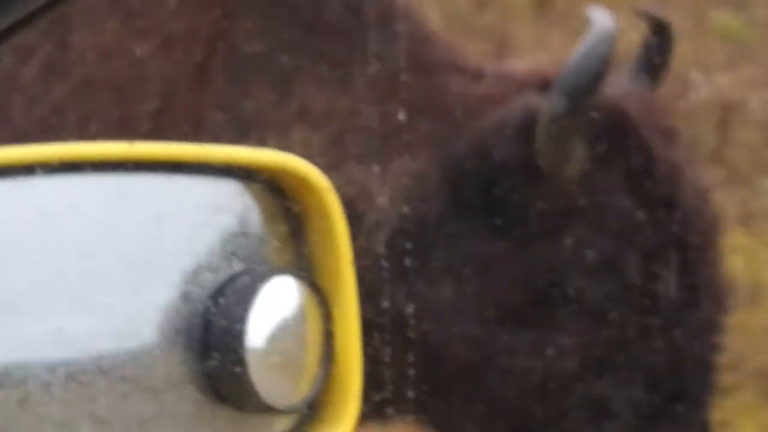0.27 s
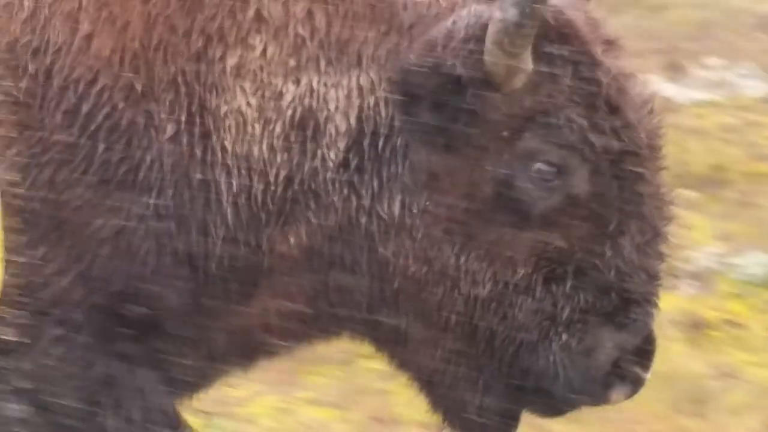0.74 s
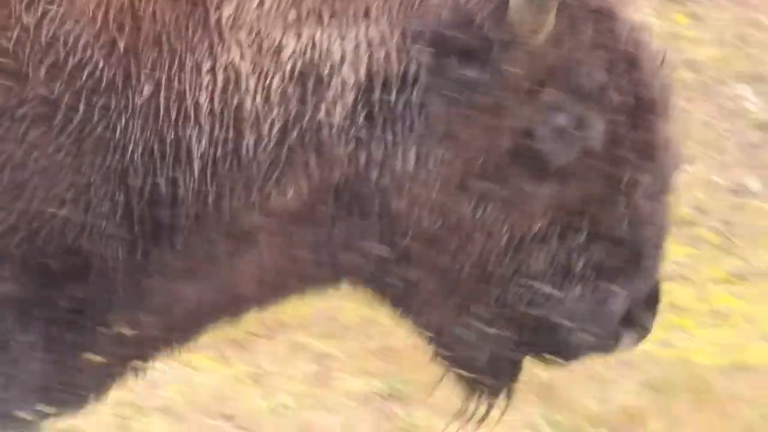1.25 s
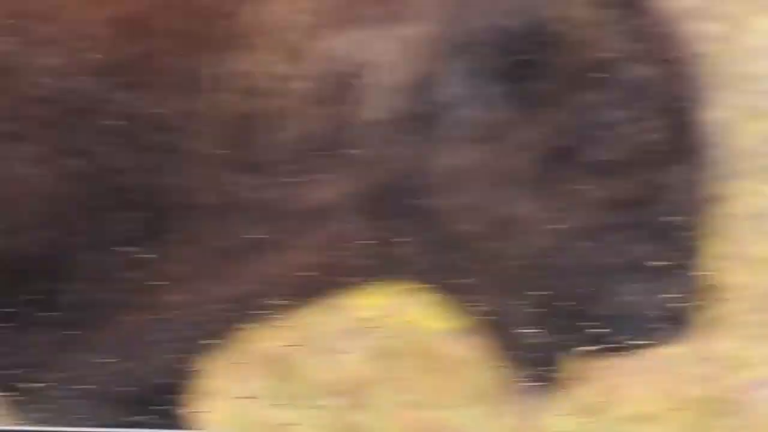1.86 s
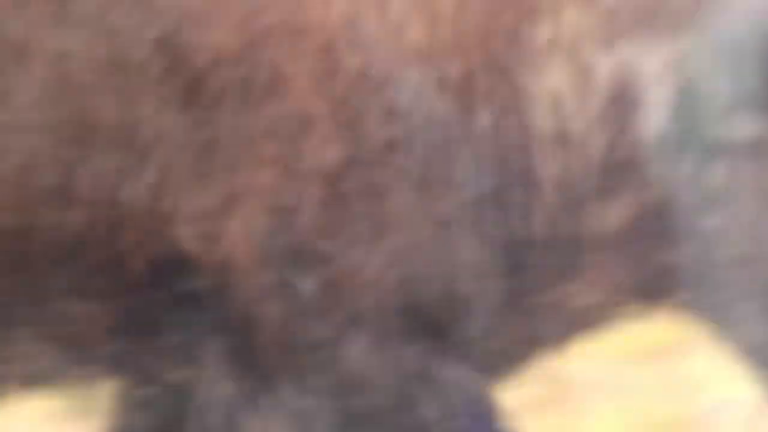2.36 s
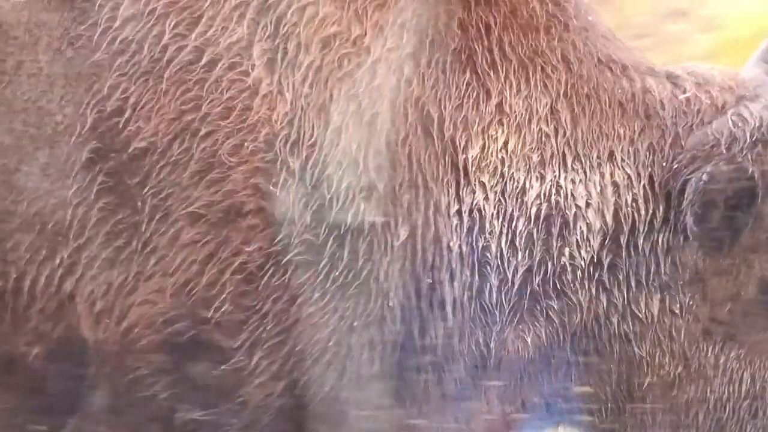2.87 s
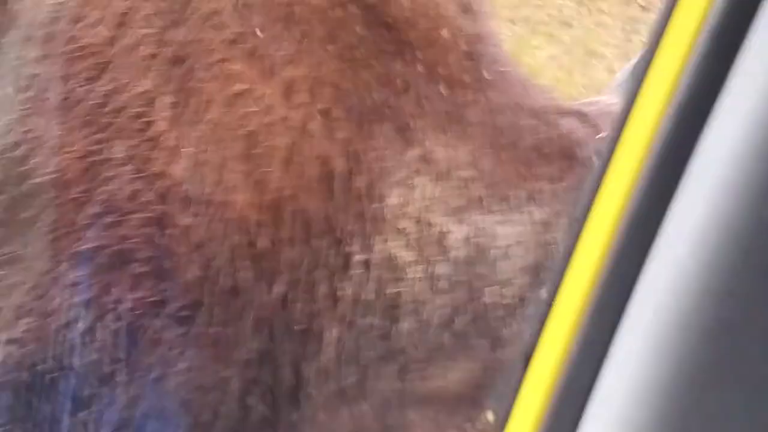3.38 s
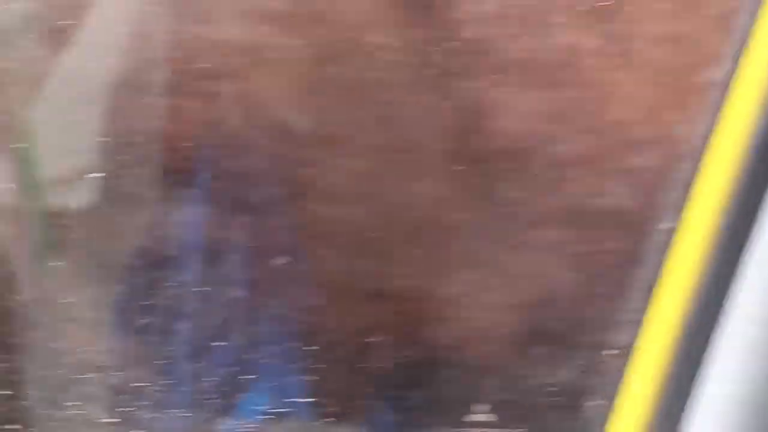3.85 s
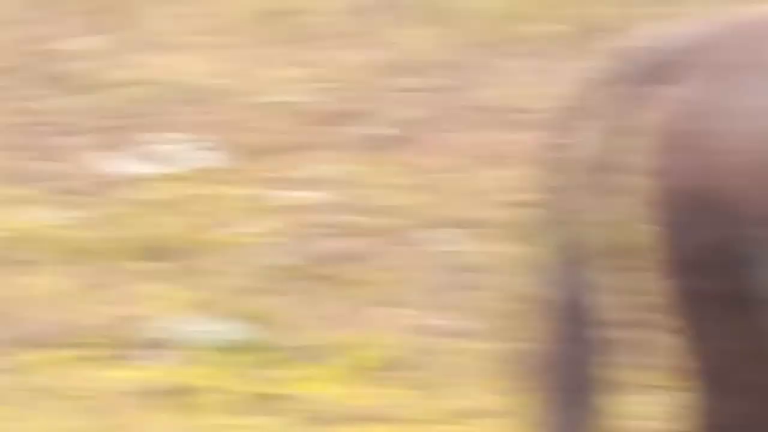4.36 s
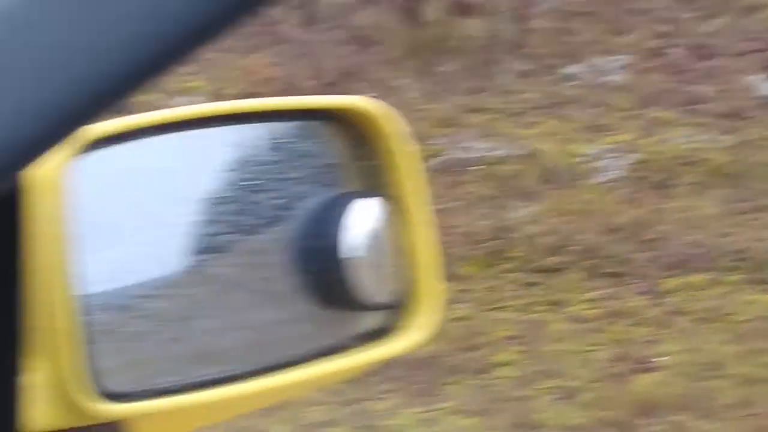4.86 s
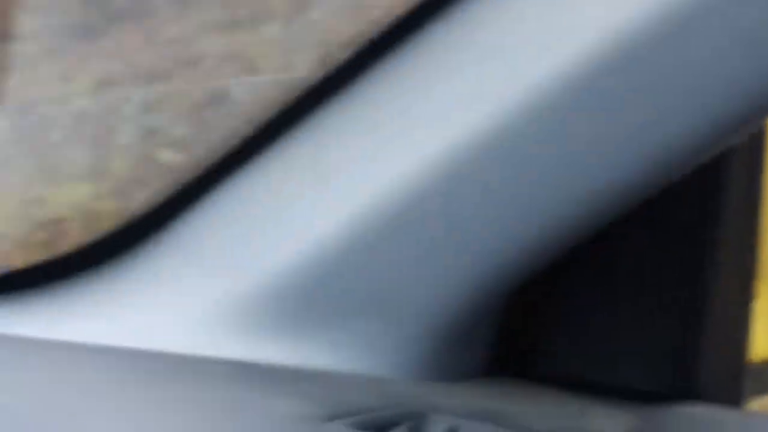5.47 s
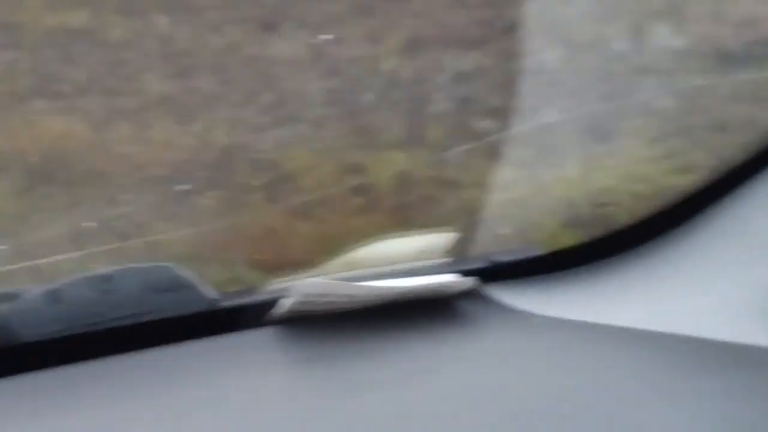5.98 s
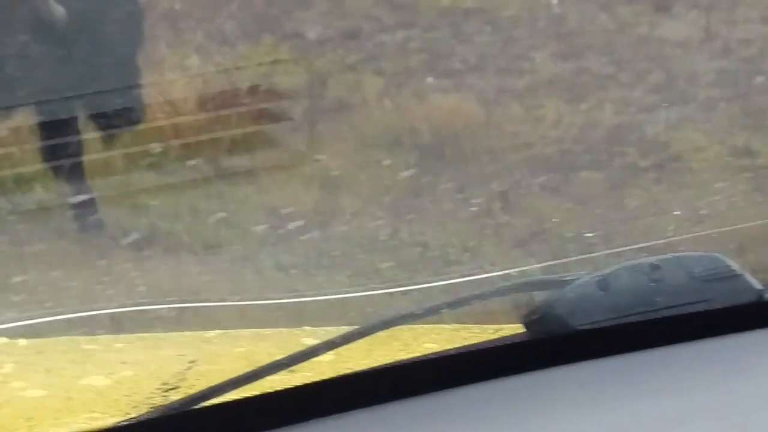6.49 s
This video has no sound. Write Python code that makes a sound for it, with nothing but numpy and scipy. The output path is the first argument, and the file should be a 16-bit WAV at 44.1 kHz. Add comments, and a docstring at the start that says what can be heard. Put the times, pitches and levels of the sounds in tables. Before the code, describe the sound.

Inside a quiet parked car, a hand-held stereo microphone picks up hiss, low rumble and cloth rustle. Dull bumps touch the hollow door as a bison passes. Just before three seconds its coat scrubs the door, the side mirror groans and snaps with a sharp clack, then a far louder double crack and boom. A faint spring ring fades, followed by small ticks, a solid thump and soft handling knocks.

```python
"""Bison against a parked car

Heard from inside: an animal leans on the door. Its coat scrubs (noise in slow swells), the side mirror snaps
over with hard clacks (noise bursts and ringing tones), the door booms and a spring rings on (fading tones).
Around this: soft knocks (pulses falling in pitch), ticks, and the rustle and low rumble of a hand-held
camera (shaped noise), with a steady hiss and a thin electronic whine (two unsteady tones)."""
import sys
import numpy as np
from scipy import signal
from scipy.fft import rfft, irfft, next_fast_len
from scipy.io import wavfile
from scipy.ndimage import map_coordinates

SR = 44100
rng = np.random.default_rng(int(sys.argv[2]) if len(sys.argv) > 2 else 0)


def inscribe(sig):
    """Save sig as 16-bit PCM at rate SR to the path in sys.argv[1].

    A 1-D sig is mono; a 2-D sig holds one channel per row.
    Samples are clipped to [-1, 1] before scaling.
    """
    pcm = np.round(np.clip(np.atleast_2d(sig).T, -1, 1) * 32767)
    wavfile.write(sys.argv[1], SR, pcm.astype(np.int16))


N = 296352  # length in samples


def amp(db):
    """Turn decibels into gain."""
    return 10 ** (np.asarray(db) / 20)


def unit(x):
    """Scale a signal to an rms of 1."""
    return x / np.sqrt(np.mean(x ** 2) + 1e-20)


def along(points, hz):
    """Read a curve of (frequency, value) points on a logarithmic frequency axis."""
    f, v = np.transpose(points)
    return np.interp(np.log(hz + 1), np.log(f + 1), v)


def wobble(rate):
    """Draw a smooth random curve with `rate` random points a second."""
    return map_coordinates(rng.standard_normal(int(N * rate / SR) + 4), [np.arange(N) * rate / SR])


def filtered(x, response):
    """Colour a sound: multiply its spectrum by a response of frequency."""
    m = next_fast_len(N + 8192)
    spectrum = rfft(x, m) * response(np.fft.rfftfreq(m, 1 / SR))
    return irfft(spectrum, m)[..., :N]


# How alike left and right are. Columns: f/Hz, likeness (1 = the same, 0 = unrelated)
LIKENESS = [(100, 0.37), (300, 0.25), (550, 0.14), (1000, -0.092), (1500, -0.035), (3000, 0.015)]


def paired(noise):
    """Blend two unrelated signals into left and right: more alike in the bass than in the treble."""
    turn = lambda hz: np.arccos(np.clip(along(LIKENESS, hz), -1, 1)) / 2
    mid, side = filtered(noise, lambda hz: np.array([np.cos(turn(hz)), np.sin(turn(hz))]))
    return np.array([mid + side, mid - side])


def rush(spectrum):
    """Make coloured stereo noise with an rms of 1."""
    noise = rng.standard_normal((2, N))
    coloured = filtered(noise, lambda hz: amp(along(spectrum, hz)))
    return unit(paired(coloured))


def add(track, s, sound):
    """Mix a sound into a track, starting at s seconds."""
    part = track[round(s * SR):][:len(sound)]
    part += sound[:len(part)]


def ring(modes, rise, pitch=1, length=1):
    """Fading tones set off by one contact; each builds up over `rise` cycles, so deep ones come last."""
    t = np.arange(int(length * SR)) / SR
    total = np.zeros(len(t))
    for hz, db, t60 in modes:
        envelope = amp(db - 60 * t / t60) * (1 - np.exp(-t * hz / rise))
        total += envelope * np.sin(2 * np.pi * hz * pitch * t)
    return total


def bursts(times, dbs, t60, rise, spectrum):
    """Many dense, quickly dying resonances, heard as a burst of noise at each contact."""
    power, t = np.zeros(N), np.arange(SR // 3) / SR
    for s, db, life in zip(times, dbs, t60 * np.ones(len(times))):
        envelope = amp(db - 60 * t / life) * (1 - np.exp(-t / rise))
        add(power, s, envelope ** 2)
    return np.sqrt(power) * rush(spectrum)


def pushes(times, dbs, spectrum, lag):
    """One pulse per contact; each frequency lags `lag` cycles, so it falls in pitch like a knocked plate."""
    response = lambda hz: amp(along(spectrum, hz)) * np.exp(-2j * np.pi * lag * np.log(hz + 1))
    contacts = np.zeros((2, N))
    contacts[:, np.round(times * SR).astype(int)] = amp(dbs)
    peak = np.abs(irfft(response(np.fft.rfftfreq(SR, 1 / SR)))).max()
    return filtered(contacts, response) / peak


def swells(times, lengths, dbs, attack):
    """Gain of sliding: it rises for the share `attack` of its length, then dies; ends lie 10 dB down."""
    share = np.clip(attack, .05, .95).reshape(-1, 1)
    u = (np.arange(N) / SR - times[:, None]) / lengths[:, None]  # 0 at the loudest moment
    away = np.maximum(-u / share, u / (1 - share)).clip(0, 20)  # 1 at either end
    return np.linalg.norm(amp(dbs[:, None] - 10 * away), axis=0)


# Thin electronic whine. Columns: f/Hz, left level/dB, right level/dB
WHINE_TONES = [(13440, -67.5, -88), (14170, -74, -65.5)]
# Colour of the hiss. Columns: f/Hz, level/dB
HISS_COLOUR = [(100, 6), (400, 4), (800, 1.5), (1400, 1), (3000, -1.5), (5000, -2), (6500, 0.5),
               (8000, -2.5), (9400, -4), (11000, -3), (15700, -1)]


def electronics():
    """Steady noise makes the hiss; tones whose pitch wanders slightly make the whine."""
    whine = 0
    for hz, left_db, right_db in WHINE_TONES:
        phase = 2 * np.pi * np.cumsum(hz + 9 * wobble(60)) / SR
        whine = whine + amp([[left_db], [right_db]]) * np.sin(phase)
    return whine + amp(-62.0) * rush(HISS_COLOUR)


# The hand shifts on the camera. Columns: t/s at the fastest, length/s, share of it spent rising,
# sleeve level/dB, skin level/dB
HAND_SHIFTS = [(0.601, 0.093, 0.33, -57.5, -72), (0.949, 0.039, 0.44, -54, -58),
               (1.083, 0.043, 0.44, -60.5, -60), (1.255, 0.13, 0.52, -61, -68),
               (1.797, 0.73, 0.71, -62, -72), (2.225, 0.35, .35, -64, -79), (3.252, 0.31, 0.5, -65, -65),
               (4.475, 0.17, 0.7, -56, -59.5), (4.555, 0.027, .4, -55.5, -63), (5.1, 0.098, .5, -63.5, -76),
               (5.75, 0.24, 0.45, -68, -81), (6.45, 1, 0.43, -82, -71)]
# Colours of the rumble, the sleeve's cloth and the sliding skin. Columns: f/Hz, level/dB
RUMBLE_COLOUR = [(20, -20.5), (33, -17), (45, 6), (80, 2), (120, -1), (170, -3.5), (300, -13), (500, -30.5),
                 (1000, -42.5)]
CLOTH_COLOUR = [(40, -25), (150, -8.5), (300, 6), (550, 0.5), (800, -2), (1200, 1), (1600, -2), (2200, -10),
                (3200, -13), (6000, -12.5), (10000, -18), (16000, -29)]
SKIN_COLOUR = [(1500, -19), (3000, -6.5), (4500, 0.5), (6500, -0.5), (8000, -8.5), (9400, -2.5),
               (11000, -15), (16000, -20)]
RESTING_RUMBLE_DB, RESTING_SLEEVE_DB, RESTING_SKIN_DB = -59.5, -68.5, -79  # a hand held still
SHAKE_DB = 6.5  # rumble of a moving hand against its sleeve


def handling():
    """Each hand shift swells a lumpy rumble, cloth rustling in tiny catches and the swish of sliding skin."""
    s, lengths, rising, sleeve_db, skin_db = np.transpose(HAND_SHIFTS)
    sleeve = swells(s, lengths, sleeve_db, rising)
    skin = swells(s, lengths, skin_db, rising)

    rumble_gain = np.hypot(amp(RESTING_RUMBLE_DB), amp(SHAKE_DB) * sleeve)
    rumble = rumble_gain * unit(amp(1.5 * wobble(18))) * rush(RUMBLE_COLOUR)

    # about 70 catches a second, of uneven strength, each dying away
    catches = (rng.random(N) < 70 / SR) * amp(4.9 * rng.standard_normal(N).clip(-2, 2))
    grain = unit(signal.lfilter([1], [1, -np.exp(-1 / (0.0097 * SR))], catches))
    rustle = np.hypot(amp(RESTING_SLEEVE_DB), sleeve) * unit(.7 + grain) * rush(CLOTH_COLOUR)

    swish = np.hypot(amp(RESTING_SKIN_DB), skin) * unit(amp(2 * wobble(34))) * rush(SKIN_COLOUR)
    return rumble + rustle + swish


# Small plastic ticks. Columns: t/s, level/dB
TICK_TIMES = [(0.4903, -52.5), (1.2852, -39.5), (2.637, -43), (3.061, -48), (3.155, -45.5), (3.1802, -41.5),
              (3.259, -46.5), (3.269, -43), (3.4511, -49), (4.2593, -33.5)]
# Colour of a tick. Columns: f/Hz, level/dB
TICK_COLOUR = [(300, -48), (1500, -9.5), (3000, -9.5), (5000, -5.5), (7500, 2.5), (10000, -13.5),
               (16000, -8)]


def ticks():
    """Plastic parts tick as they settle: short, bright bursts."""
    return bursts(*np.transpose(TICK_TIMES), t60=0.042, rise=0.0011, spectrum=TICK_COLOUR)


# Soft knocks on the hand-held camera. Columns: t/s, thump level/dB, edge level/dB
CAMERA_KNOCKS = [(.335, -46, -58), (.949, -44, -58), (1.666, -43.5, -55), (1.755, -50.5, -55),
                 (2.111, -50, -53.5), (2.417, -40.5, -53), (3.59, -45.5, -65), (3.777, -51, -55),
                 (4.223, -44.5, -72), (4.259, -44.5, -52.5), (4.483, -27.5, -44.5), (4.553, -44.5, -61),
                 (4.69, -44, -38.5), (4.754, -46, -57), (4.82, -42, -56.5), (5.33, -41.5, -54),
                 (5.42, -47, -55), (5.623, -39.5, -53), (5.684, -46, -56), (5.77, -44, -57)]
# Colours of the hard edge, the tap and the low thump. Columns: f/Hz, level/dB
EDGE_COLOUR = [(150, -70), (400, -2), (700, 5), (1200, 4), (1800, -5.5), (3000, -16.5), (4600, -5.5),
               (6500, -34), (12000, -47)]
TAP_COLOUR = [(120, -14), (220, -3), (290, 5.5), (350, 6), (430, -0.5), (540, -10.5), (800, -10),
              (1800, -46), (5000, -87.5)]
THUMP_COLOUR = [(30, -24), (55, -1.5), (80, 1), (120, 5), (180, -0.5), (260, -10.5), (400, -47),
                (1500, -98)]
# The heaviest knock also rings the door's lining. Columns: f/Hz, level/dB, time to fade by 60 dB t/s
LINING_MODES = [(121.6, -35, 0.2), (176.2, -28.5, 0.14), (301, -34, 0.065), (357, -29.5, .055),
                (414, -38, 0.034)]
TAP_DB, TAP_GROWS = -2, 0.68  # tap against thump for the hardest edge; dB of tap per dB of edge
EDGE_PAN_DB = -15.5  # left minus right
FAINT_THUMP_DB, FAINT_EDGE_DB, FAINT_SPREAD_DB = -56, -64.5, 3  # stray touches of the fingers


def knocks():
    """A hard edge, a tap, then a low thump; nearby trim scatters them. Faint touches fall at random."""
    chance = rng.random(size=(10, 3))
    faint_s = chance[:, 0] * (N - 1) / SR
    faint_db = [FAINT_THUMP_DB, FAINT_EDGE_DB] + FAINT_SPREAD_DB * (2 * chance[:, 1:] - 1)
    faint = np.column_stack([faint_s, faint_db])
    s, thump_db, edge_db = np.vstack([CAMERA_KNOCKS, faint]).T
    tap_db = thump_db + TAP_DB + TAP_GROWS * (edge_db - edge_db.max())

    lag = 1.05  # cycles
    edge = pushes(s, edge_db + np.array([[.5], [-.5]]) * EDGE_PAN_DB, EDGE_COLOUR, lag)
    body = pushes(s, thump_db, THUMP_COLOUR, lag) + pushes(s, tap_db, TAP_COLOUR, lag)
    scattered_tap = amp(-0.5) * bursts(s, tap_db, t60=0.068, rise=0.0054, spectrum=TAP_COLOUR)
    scattered_edge = amp(-5) * bursts(s, edge_db, t60=0.048, rise=0.0026, spectrum=EDGE_COLOUR)
    lining = np.zeros(N)
    add(lining, s[np.argmax(thump_db)], ring(LINING_MODES, rise=1.36))
    return edge + body + scattered_tap + scattered_edge + lining


# The animal nudges the hollow door. Columns: t/s, level/dB
DOOR_NUDGES = [(.936, -54), (1.464, -53), (1.568, -37.5), (1.841, -44), (1.9, -46.5), (2.191, -47),
               (2.229, -46.5), (2.605, -51), (4.133, -53)]
# Colour of the hollow. Columns: f/Hz, level/dB
HOLLOW_COLOUR = [(50, -21), (110, -2), (160, 7), (230, -4), (300, 2.5), (390, -10.5), (540, 5),
                 (700, -13.5), (1300, -13), (1750, -9), (2300, -17.5), (3800, -25), (8000, -39)]


def nudges():
    """Light bumps sound the hollow of the door: dull, short bursts."""
    return bursts(*np.transpose(DOOR_NUDGES), t60=0.11, rise=0.0029, spectrum=HOLLOW_COLOUR)


# The coat drags over the door. Columns: t/s at the firmest, length/s, level/dB
COAT_RUBS = [(1.93, .3, -63), (2.25, 0.22, -68), (2.775, .1, -36.5), (2.945, .055, -47)]
# The mirror's pivot gives way. Columns: t/s at the loudest, length/s, level/dB
PIVOT_SLIPS = [(2.711, .035, -56.5), (2.783, .06, -31), (2.87, .022, -37.5)]
# Colours of the fur and of the groaning pivot. Columns: f/Hz, level/dB
COAT_COLOUR = [(60, -16), (140, -2), (220, -5.5), (290, -2), (390, -12), (470, -0.5), (540, -4.5),
               (660, -11.5), (1200, -9.5), (1950, -9.5), (3000, -20.5), (6500, -24), (10000, -35.5),
               (16000, -35.5)]
PIVOT_COLOUR = [(100, -69), (300, -36.5), (440, -16.5), (490, 3), (530, -2), (590, -15), (800, -35),
                (1600, -42), (2000, -25.5), (2500, -44), (5000, -87)]


def coat():
    """Fur drags over the door in uneven slips while the mirror's pivot groans under the load."""
    rub = swells(*np.transpose(COAT_RUBS), attack=.28)
    fur = rub * unit(amp(2.5 * wobble(70))) * rush(COAT_COLOUR)
    slip = swells(*np.transpose(PIVOT_SLIPS), attack=0.55)
    groan = slip * unit(amp(2 * wobble(62))) * rush(PIVOT_COLOUR)
    return fur + groan


# Blows on mirror and door. Columns: t/s, crack level/dB, boom level/dB, pitch factor of the door,
# time for the crack to fade by 60 dB t/s
MIRROR_BLOWS = [(2.7399, -42.5, -32, 1.05, .05), (2.751, -42.5, -21, 0.86, .05),
                (2.7796, -16.5, -21.5, .95, 0.029), (2.786, -36.5, -11.5, .86, .046),
                (2.863, -31.5, -35, .85, 0.068), (2.952, -6, -1, 1.0, .066),
                (2.9789, -11.5, -8.5, 1.03, 0.088), (2.991, -24.5, -18.5, 1.0, .06)]
# Ringing of door panel and cabin air; of the mirror housing; and of what only the hardest blow sets
# swinging: cabin air (the two deepest) and the mirror's spring.
# Columns of all three: f/Hz, level/dB, time to fade by 60 dB t/s
DOOR_MODES = [(66, -25, 0.33), (124, -17, 0.2), (163.26, 2, 0.082), (185.3, -12, 0.12), (295.7, -7.5, .1),
              (362, -5, 0.043), (517, -22, 0.06), (826, -24, 0.087)]
HOUSING_MODES = [(1610, -17, 0.12), (1890, 5.5, 0.051), (2050, -12.5, 0.044), (2374, 5.5, 0.0093),
                 (4030, -6, 0.019), (4156, -12, 0.087), (4400, -16.5, 0.1), (4587, -12.5, 0.081),
                 (4450, -9.5, 0.022), (5297, -15, 0.16), (6175, -13.5, 0.093), (7050, -28, 0.18),
                 (7523, -16.5, 0.15), (9000, -26.5, 0.1)]
SWING_MODES = [(45, -15, .24), (64, -21, .22), (112, -39.5, 2.2), (138, -37, 1.8), (149.4, -42, 2.0),
               (163, -39, 1.9), (265, -48, .7)]
# Colours of the cracking mirror housing and the clattering door trim. Columns: f/Hz, level/dB
SHELL_COLOUR = [(200, -40.5), (600, -13), (900, -3), (1300, -2.5), (1900, 3), (2300, 8), (2800, -2.5),
                (4000, 1.5), (5400, -3.5), (6700, 1.5), (8500, -8.5), (12000, -11), (16000, -15)]
CLATTER_COLOUR = [(40, -50), (120, -24.5), (220, -8), (310, -1), (410, -12.5), (510, 5), (580, -2),
                  (680, -10), (850, -10), (1100, -14), (3000, -72)]
CLATTER_DB, CLATTER_GROWS = -13.5, 0.52  # trim shaken by a 0 dB crack; dB of clatter per dB of crack
HOUSING_DB = -14.5  # the housing's ring against its crack
CRACK_RISE_S = .0008


def mirror():
    """Blows crack and ring the housing, shake the trim and boom the door; the hardest rings the spring."""
    s, crack_db, boom_db, _, t60 = np.transpose(MIRROR_BLOWS)
    body, housing = np.zeros(N), np.zeros((2, N))
    for start, crack, boom, pitch, _ in MIRROR_BLOWS:
        add(body, start, amp(boom) * ring(DOOR_MODES, rise=1.0, pitch=pitch))
        for side in housing:  # each side hears the modes at new strengths and a slightly different time
            struck = [(hz, db + rng.normal(0, 3), life) for hz, db, life in HOUSING_MODES]
            sound = amp(crack + HOUSING_DB) * ring(struck, rise=0.9, length=.25)
            add(side, start + rng.uniform(0, 0.00037), sound)
    add(body, s[np.argmax(boom_db)], ring(SWING_MODES, rise=1.6, length=3))

    chatter = unit(amp(3.4 * wobble(350)))  # the plastic chatters
    cracks = bursts(s, crack_db, t60, CRACK_RISE_S, SHELL_COLOUR) * chatter
    clatter_db = CLATTER_DB + CLATTER_GROWS * crack_db
    clatter = bursts(s, clatter_db, t60=0.075, rise=.0015, spectrum=CLATTER_COLOUR)
    # everything leans a little to the left
    return (body + clatter) * amp([[.6], [-.6]]) + (cracks + housing) * amp([[1.3], [-1.3]])


# How long the cabin's echo lasts. Columns: f/Hz, time to fade by 60 dB t/s
CABIN_FADE = [(60, 0.94), (200, 0.65), (1000, 0.15), (4000, 0.15), (6500, 0.35), (9000, 0.33), (15000, 0.3)]


def cabin(x):
    """The padded cabin's short reverberation: noise fading at its own speed in each frequency band."""
    hz, t, z = signal.stft(rng.standard_normal((2, SR // 2)), SR, nperseg=256)
    fade = amp(-60 * t / along(CABIN_FADE, hz)[:, None])
    tail = signal.istft(z * fade, SR, nperseg=256)[1]
    echo = signal.fftconvolve(x, tail / np.linalg.norm(tail[0]), axes=1)[:, :N]
    return paired(echo)


def scene():
    """Mix everything that sounds in and on the car; only the contacts reverberate."""
    contacts = mirror() + coat() + nudges() + knocks() + ticks()
    return contacts + amp(-17) * cabin(contacts) + handling() + electronics()


# Colour difference of the microphone ports. Columns: f/Hz, left minus right level/dB
PORT_COLOURS = [(100, -3.5), (300, -2), (600, -2), (1200, -7), (2200, -5), (3000, 0), (4000, 3.5),
                (5200, -1), (6500, 12), (7300, 5.5), (8500, -4.5), (11000, -4.5), (15000, -8.5)]
TOP_HZ = 15850  # nothing is left from here up


def record(dry):
    """Each microphone port has its colour; deep bass is cut, peaks are rounded, the band ends steeply."""
    heard = filtered(dry, lambda hz: amp(np.outer([.5, -.5], along(PORT_COLOURS, hz))))
    heard = signal.sosfilt(signal.butter(4, 35, "highpass", fs=SR, output="sos"), heard)
    rounded = heard / (1 + np.abs(heard / .95) ** 6) ** (1 / 6)
    return filtered(rounded, lambda hz: hz < TOP_HZ)


dry = scene()
out = record(dry)
inscribe(out)
```